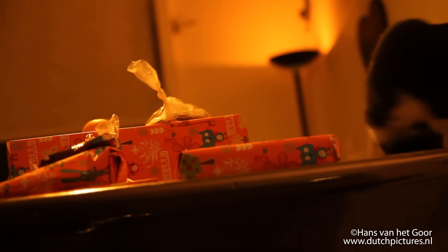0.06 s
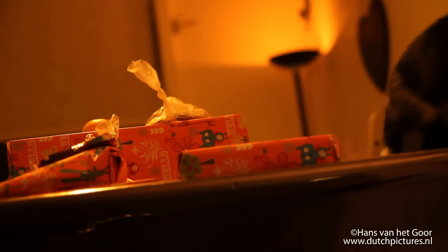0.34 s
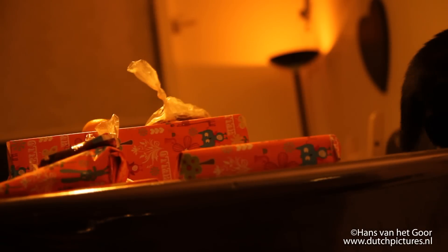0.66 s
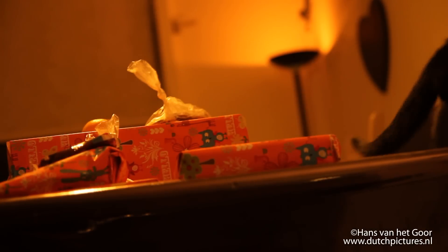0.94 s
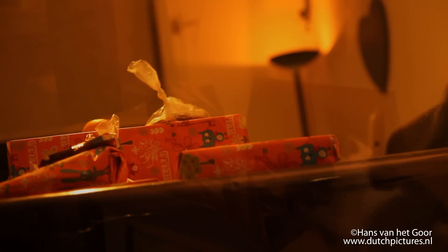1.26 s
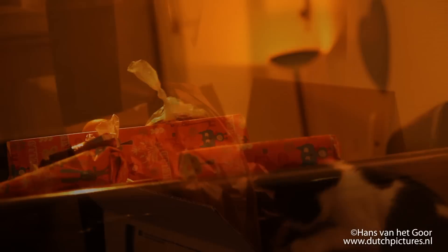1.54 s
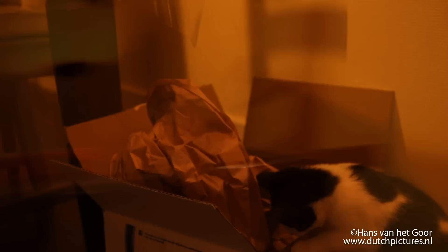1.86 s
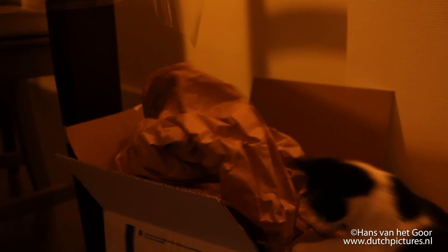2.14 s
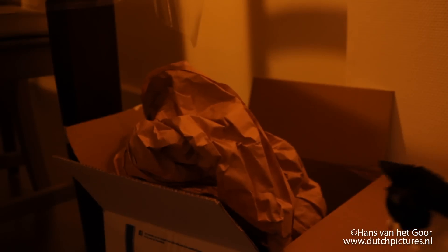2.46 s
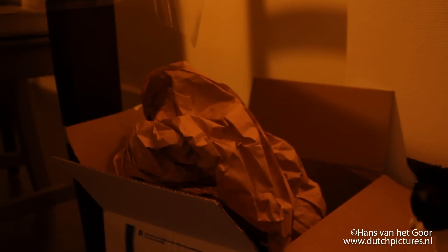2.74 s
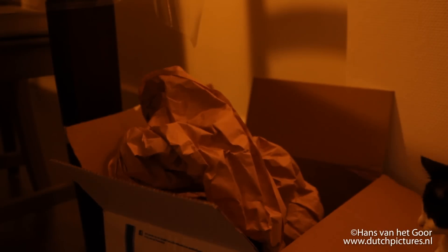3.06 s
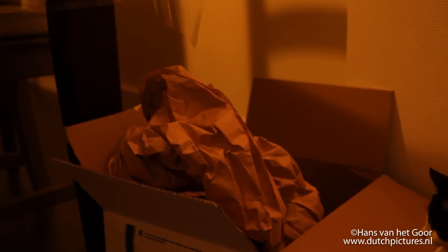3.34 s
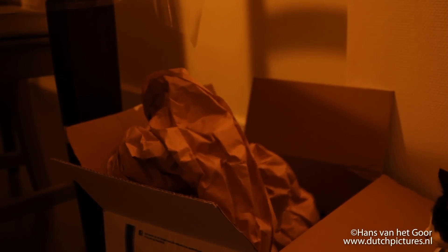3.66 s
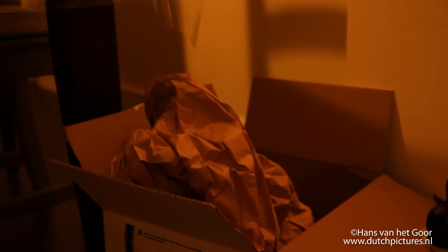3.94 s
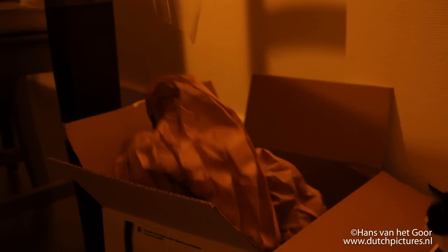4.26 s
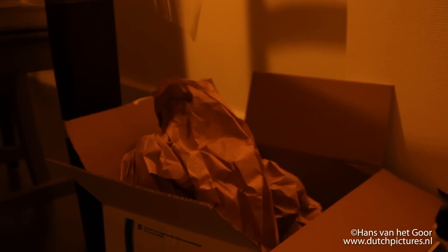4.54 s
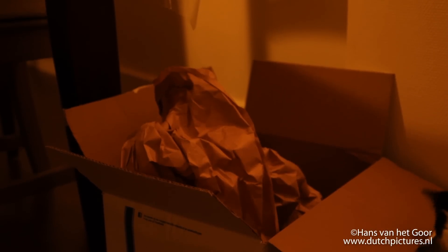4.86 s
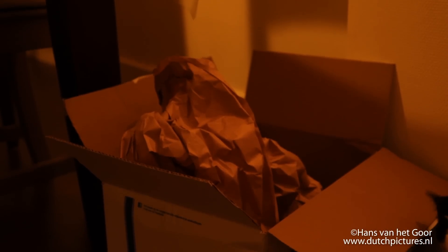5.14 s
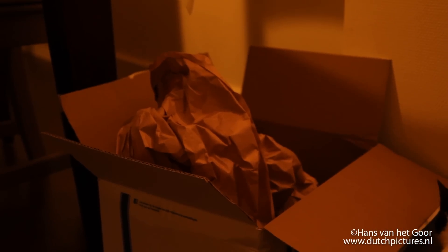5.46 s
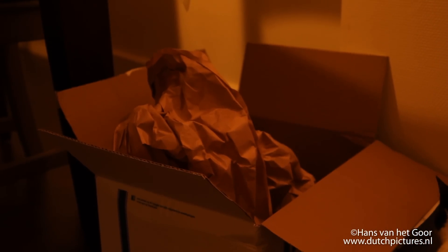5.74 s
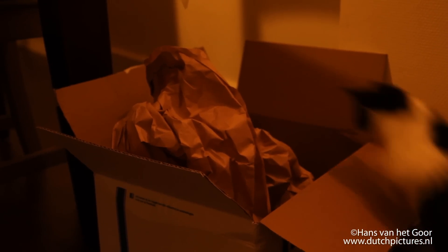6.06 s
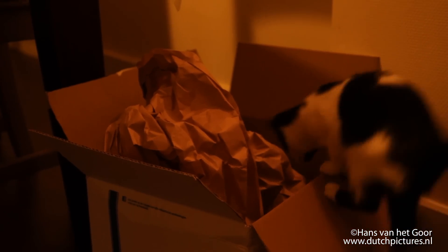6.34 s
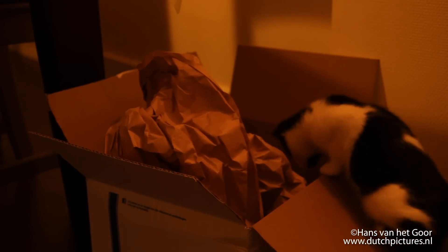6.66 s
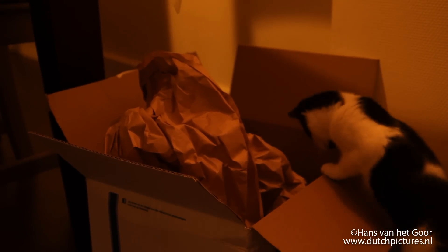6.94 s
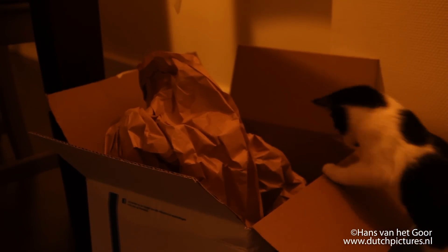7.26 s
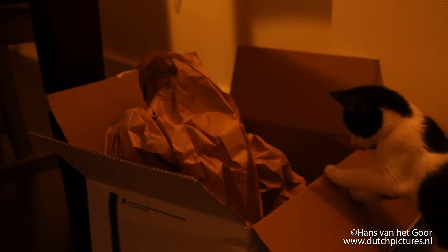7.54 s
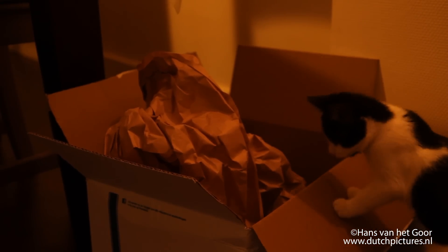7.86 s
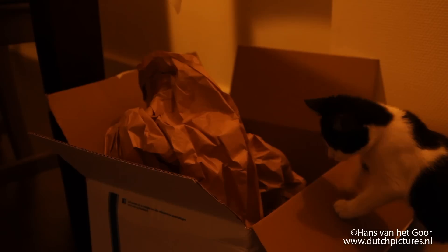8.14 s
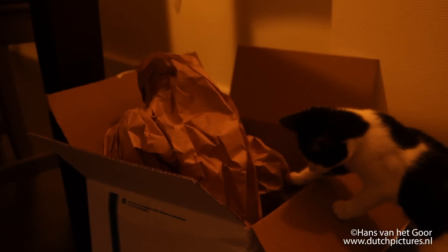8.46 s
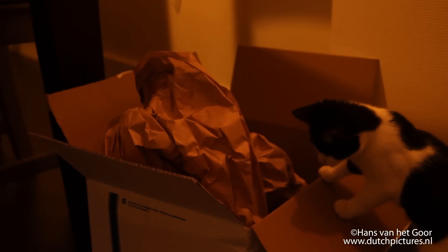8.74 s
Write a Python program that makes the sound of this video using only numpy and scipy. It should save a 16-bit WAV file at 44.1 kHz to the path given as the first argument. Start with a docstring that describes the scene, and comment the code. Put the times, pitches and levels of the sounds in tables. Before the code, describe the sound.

Soft paw thumps and a faint slide of fur on a tabletop give way to cats rustling paper inside a cardboard box. The crinkles and crisp snaps come in uneven spurts, pause, then return after some hollow steps on a cardboard flap. It is all heard from a few steps away in a still, slightly echoing room, over low hiss and a faint electric whine that disappears about two thirds through.

```python
"""Cats play in a cardboard box of crumpled packing paper, in a quiet living room with a faint whine.
First a cat turns on a table and brushes off its edge: pads thud on the panel, fur slides over it.
From 1.6 s paws crush the paper in bursts: facets buckle and ring, sheets rub, single creases snap.
Then a cat steps onto a flap of the box, the whine fades, and a last burst of crinkling starts at 8.4 s.
The box colours every stir, and the room rings after each burst."""
import sys
import numpy as np
from scipy import signal
from scipy.fft import rfft, irfft, next_fast_len
from scipy.io import wavfile
from scipy.ndimage import uniform_filter1d

SR = 44100
rng = np.random.default_rng(int(sys.argv[2]) if len(sys.argv) > 2 else 0)


def store_pcm(level_fs):
    """Save levels as 16-bit WAV."""
    pcm = np.round(np.clip(level_fs, -1, 1) * 32767).astype(np.int16)
    wavfile.write(sys.argv[1], SR, np.atleast_2d(pcm).T)


N = 388521
TIME_S = np.arange(N) / SR


def gain_of(db):
    """Decibels to amplitude."""
    return 10 ** (np.asarray(db) / 20)


def unit_rms(x):
    """Scales to rms 1."""
    return x / np.sqrt(np.mean(x ** 2) + 1e-20)


def curve_at(points, hz):
    """Interpolates (frequency, value) points on a log-frequency axis."""
    point_hz, values = np.transpose(points)
    return np.interp(np.log(hz + 1), np.log(point_hz + 1), values)


def add(mix, start_s, sound):
    """Mixes a sound in at start_s."""
    part = mix[max(round(start_s * SR), 0):][:len(sound)]
    part += sound[:len(part)]


def colour(x, db_at, size=4096):
    """Minimum-phase filter with gain db_at(hz)."""
    hz = abs(np.fft.fftfreq(size, 1 / SR))
    log_gain = np.log(gain_of(db_at(hz)) + 1e-6)
    taps = np.fft.ifft(np.exp(np.conj(signal.hilbert(log_gain)))).real
    return signal.oaconvolve(x, taps[:size // 2])[:len(x)]


# hush spectrum: (frequency [Hz], relative level [dB])
HUSH_SPECTRUM = [(25, -36), (70, -13), (120, -8.5), (200, -5.5), (380, -2), (550, -7), (1000, -8.5),
                 (2000, -13), (5000, -17.5), (10500, -23.5), (15800, -26.5)]


def hush(rms_db=-54):
    """Still room and steady hiss."""
    noise = colour(rng.standard_normal(N), lambda hz: curve_at(HUSH_SPECTRUM, hz))
    return gain_of(rms_db) * unit_rms(noise)


# whine partials: (frequency [Hz], rms level [dB])
WHINE_TONES = [(650, -65), (1301, -71.5)]


def whine(fade_span_s=(6.0, 6.6)):
    """Faint electric whine: steady tones that fade out."""
    tones = sum(gain_of(db) * np.sqrt(2) * np.sin(2 * np.pi * hz * TIME_S) for hz, db in WHINE_TONES)
    return tones * np.interp(TIME_S, fade_span_s, [1, 0])


def room_mode(x, hz=201, t60_s=1.84, tap_db=-66):
    """One low room resonance outlasts the echoes."""
    t = TIME_S[:2 * SR]
    ring = gain_of(tap_db - 60 * t / t60_s) * np.sin(2 * np.pi * hz * t)
    return signal.oaconvolve(x, ring)[:N]


# room reverberation: (frequency [Hz], T60 [s])
ROOM_DECAY = [(90, 0.75), (200, 0.29), (400, 0.67), (1400, 0.59), (3000, 0.48), (6000, 0.42), (12000, 0.33)]


def reflections(gap_s=0.0038, build_s=0.0016):
    """Impulse response: dense echoes of random sign, each band dying at its own rate."""
    hz, t, bands = signal.stft(rng.choice([-1., 1.], SR), SR, nperseg=256)
    t60_s = curve_at(ROOM_DECAY, hz)[:, None]
    decaying = bands * gain_of(-60 * t / t60_s) / np.sqrt(t60_s)
    tail = signal.istft(decaying, SR, nperseg=256)[1][:SR]
    tail *= np.clip((TIME_S[:SR] - gap_s) / build_s, 0, 1)
    return tail / np.linalg.norm(tail)


def room_echoes(x, spots=5, dwell_s=0.004):
    """The sound leaps from spot to spot on the paper; each spot has its own echoes."""
    leaps_s = np.arange(0, TIME_S[-1] + dwell_s, dwell_s)
    spot = rng.integers(0, spots, len(leaps_s))
    shares = (np.sin(np.pi / 2 * np.interp(TIME_S, leaps_s, 1. * (spot == k))) for k in range(spots))
    return sum(signal.oaconvolve(x * share, reflections())[:N] for share in shares)


# resonances of the open box and hollows in the paper: (frequency [Hz], width [Hz], gain [dB])
BOX_MODES = [(208, 8.9, 9.5), (270, 17, 9.5), (410, 13.6, 9), (510, 10, 4.5), (775.4, 10.3, 7.5),
             (845, 11, 2.5), (1004, 28, 4.5), (1153, 12.5, 7), (1530, 31, 2.5), (1657, 7, 7.5),
             (2450, 370, -1), (2700, 31, 2), (3400, 86, 1.5)]


def box_db(hz):
    """Narrow resonances that colour everything stirring in the box."""
    return sum(db / (1 + (2 * (hz - mode_hz) / width_hz) ** 2) for mode_hz, width_hz, db in BOX_MODES)


# paper response: (frequency [Hz], gain [dB])
PAPER_SPECTRUM = [(25, -45), (50, -39), (90, -15), (180, -8.5), (360, 1.5), (720, 0), (1440, -0.5),
                  (2880, -3.5), (5760, -10), (11300, -18), (16000, -28.5)]


def paper_db(hz):
    """Broad paper colour plus the resonances around it."""
    return curve_at(PAPER_SPECTRUM, hz) + box_db(hz)


def shudder(decay_s, size=4096):
    """A dying run of rapid random slips."""
    return rng.choice([-1., 1.], size) * np.exp(-TIME_S[:size] / decay_s)


# panel response to a paw: (frequency [Hz], gain [dB])
THUD_SPECTRUM = [(25, -17), (55, -0.5), (80, -3), (120, -3.5), (200, 2), (380, -2), (700, -16.5),
                 (1440, -25.5), (4000, -40), (16000, -56)]
# paw landings: (time [s], relative level [dB], tilt [dB/octave])
PAW_STEPS = [(0.001, -19, 5), (0.05, -17, 0.5), (0.201, -18, -1), (0.236, -18.5, 3.5), (0.286, -15.5, -3),
             (0.35, -26, -4), (1.135, -22.5, -3.5), (1.719, -28, 1), (1.83, -21, -1.5), (1.869, -28, 6),
             (1.92, -38, 1), (2.171, -34, -3), (3.02, -34, 2), (4.39, -16.5, 0), (6.232, -16.5, 4),
             (6.262, -22, 3), (6.495, -14, 6), (6.612, -13, 0.5), (6.872, -18.5, 1), (6.905, -23.5, -1.5),
             (6.93, -19, -1.5), (7.56, -32, 4.5)]


def paw_steps(decay_s=0.012, press_s=0.0024, pivot_hz=200):
    """Soft pads shake the panel beneath them: deep on the table, higher on a flap."""
    out = np.zeros(N)
    octaves = lambda hz: np.log2(np.maximum(hz / pivot_hz, 0.35))
    for start_s, level_db, tilt_db_per_oct in PAW_STEPS:
        panel_db = lambda hz: curve_at(THUD_SPECTRUM, hz) + box_db(hz) + tilt_db_per_oct * octaves(hz)
        push = shudder(decay_s)
        push *= 1 - np.exp(-TIME_S[:len(push)] / press_s)
        add(out, start_s, gain_of(level_db) * colour(push, panel_db))
    return out


def stroke(crest_s, swell_s, hold_s, swell_db=22.5, sag_db=9.5, release_db_per_s=446):
    """One movement swells, sags while the paw moves, dies on release. Returns (indices, amplitude)."""
    t = TIME_S - crest_s
    db = swell_db * np.minimum(t, 0) / swell_s
    db -= sag_db * np.clip(t / hold_s, 0, 1)
    db -= release_db_per_s * np.maximum(t - hold_s, 0)
    active = np.flatnonzero(db > -60)
    return active, gain_of(db[active])


def apply_strokes(texture, strokes, band_count=6, bass_hz=340, middle_hz=1260, treble_hz=7700):
    """Gives a steady texture each stroke's level and colour, band by band; overlaps add in power."""
    centres_hz = np.geomspace(bass_hz, treble_hz, band_count)
    power = np.zeros((band_count, N))
    for crest_s, swell_s, hold_s, level_db, bass_db, treble_db in strokes:
        active, envelope = stroke(crest_s, swell_s, hold_s)
        shelves_db = curve_at([(bass_hz, bass_db), (middle_hz, 0), (treble_hz, treble_db)], centres_hz)
        power[:, active] += np.outer(gain_of(level_db + shelves_db), envelope) ** 2
    size = next_fast_len(N)
    spectrum, hz = rfft(texture, size), np.fft.rfftfreq(size, 1 / SR)
    band_gains = (curve_at(np.c_[centres_hz, share], hz) for share in np.eye(band_count))
    bands = [irfft(spectrum * gain, size)[:N] for gain in band_gains]
    return np.sum(bands * np.sqrt(power), axis=0)


def crackle(clicks_per_s, spread_db, decay_cycles, pitch_count=32, ring_samples=400, lag_samples=20):
    """Facets buckle at random, most weakly: each a crack, then a tiny ring at its own pitch."""
    strength = gain_of(spread_db * np.minimum(rng.exponential(1, N), 4)) * rng.choice([-1, 1], N)
    clicks = strength * (rng.random(N) < clicks_per_s / SR)
    clicks /= np.sqrt(abs(uniform_filter1d(clicks ** 2, size=1100)) + 1e-3)  # steady energy from the paw
    facet = rng.integers(0, pitch_count, N)
    pitch_hz = np.geomspace(500, 15000, pitch_count)[:, None]
    cycles = pitch_hz * TIME_S[:ring_samples]
    rings = pitch_hz * np.exp(-cycles / decay_cycles) * np.cos(2 * np.pi * cycles)
    onsets = np.flatnonzero(clicks)
    ringing = np.zeros(N + ring_samples)
    reach = onsets[:, None] + np.arange(ring_samples)
    np.add.at(ringing, reach, clicks[onsets, None] * rings[facet[onsets]])
    return unit_rms(unit_rms(clicks) + unit_rms(np.roll(ringing[:N], lag_samples)))


# fur and pads sliding over table and cardboard:
# (crest time [s], swell [s], hold [s], relative level [dB], bass [dB], treble [dB])
FUR_SWIPES = [(0.0, .005, 0.034, -21, 6, -24), (0.14, .15, 0.6, -55.5, -2, 11.5),
              (0.726, 0.093, 0.16, -45, -18, 9.5), (0.858, .08, .01, -42, -5, 4),
              (0.985, 0.092, 0.048, -50.5, 9.5, 12.5), (1.14, 0.29, .02, -42, 1, 4),
              (1.312, 0.097, 0.025, -44.5, -3, 9), (1.417, 0.092, .03, -48.5, 7, 8),
              (1.49, 0.046, 0.023, -41, 4, 0.5), (3.24, .04, 0.15, -54.5, -6, 18.5),
              (3.457, .08, .04, -54, -6, 17.5), (6.444, .008, 0.044, -35.5, 3, 14)]


def fur_brush(grit_db=-8):
    """Smooth friction of fur with a little grit."""
    friction = rng.standard_normal(N)
    grit = gain_of(grit_db) * crackle(clicks_per_s=600, spread_db=9.0, decay_cycles=0.52)
    return apply_strokes(unit_rms(friction + grit), FUR_SWIPES)


# creases buckling, sheets knocking, claws catching:
# (time [s], relative level [dB], centre [Hz], fall to both sides [dB/octave], flutter decay [s])
CREASE_SNAPS = [(0.001, -18.5, 930, 23, 0.0095), (1.054, -25, 2500, 1.5, 0.0036),
                (1.594, -14.5, 1900, 10, 0.0057), (1.819, -9.5, 4770, 2.5, 0.0026),
                (1.832, -7.5, 4000, 13, 0.0041), (1.835, -2, 470, 15, 0.0043), (1.852, -7, 644, 10, 0.0047),
                (1.868, -2.5, 510, 17.5, 0.0024), (2.44, -6, 5400, 10.5, 0.0016),
                (2.999, -6.5, 6000, 3.5, 0.0073), (3.04, -6.5, 935, 5.5, 0.0065),
                (3.294, -22.5, 1980, 12, 0.0046), (3.35, -25.5, 3820.0, 3, 0.0042),
                (3.371, -25, 1180, 4, 0.0071), (3.528, -7.5, 10100, 28, 0.0037),
                (3.656, -12, 493, 8, 0.0035), (4.088, -16, 2000, 18, 0.011),
                (4.261, -21, 8980.0, 4.5, 0.0023), (4.39, -1.5, 2300, 4, 0.0021),
                (4.3935, 6, 910, 11.5, 0.0035), (4.435, -3.5, 1910, 7.5, 0.011),
                (4.445, -2.5, 2340, 8.5, 0.0053), (4.804, -23, 2750, -1, 0.0021),
                (6.229, -20.5, 4300, 5, 0.0026), (6.231, -16.5, 360, 27, 0.0063),
                (6.426, -24.5, 3630.0, 2.5, 0.0035), (6.486, -12.5, 1100, 7, 0.003),
                (6.492, -9.5, 1020, 7, 0.0065), (6.493, -3, 5480.0, 18, 0.0027),
                (6.607, -12, 3800, 10, 0.0032), (6.913, -24, 3430.0, 11, 0.0033),
                (6.942, -23.5, 4500, 10, 0.0017), (6.979, -25, 8550.0, 4.5, 0.0064),
                (7.097, -7.5, 1190, 10, 0.003), (7.103, -6, 2720, 24, 0.0072),
                (7.108, -10, 11000, 9, 0.002), (7.111, -10.5, 3060, 15, 0.0065),
                (7.337, -38, 2460, -4.5, 0.002), (7.643, -30.5, 8630.0, 14, 0.0031),
                (8.431, -18, 5390.0, 16, 0.0037), (8.588, -17, 3340.0, 2.5, 0.013),
                (8.641, -8.5, 4400, -1.5, 0.0023)]


def crease_snaps():
    """A crease gives way and the sheet flutters; small facets sound high, large ones low."""
    out = np.zeros(N)
    for start_s, level_db, centre_hz, fall_db_per_oct, flutter_s in CREASE_SNAPS:
        facet_db = lambda hz: -fall_db_per_oct * (np.hypot(1, np.log2((hz + 1) / centre_hz)) - 1)
        add(out, start_s, gain_of(level_db) * colour(shudder(flutter_s), facet_db))
    return out


# paws pushing into paper; bass from whole sheets, treble from fine creases:
# (crest time [s], swell [s], hold [s], relative level [dB], bass [dB], treble [dB])
PAPER_PUSHES = [(1.624, 0.038, 0.02, -24.5, 4, 3.5), (1.722, .024, 0.083, -32.5, 4, -3),
                (1.834, 0.016, 0.011, -11, 9.5, 1), (1.913, .06, 0.077, -28, -13, -5.5),
                (2.131, 0.054, 0.035, -16, 2.5, 3.5), (2.184, 0.042, 0.073, -9.5, -0.5, 1.5),
                (2.375, 0.071, 0.068, -19, -0.5, -3.5), (2.563, 0.05, 0.034, -38.5, 11, -2),
                (2.967, 0.011, .035, -21, -1, -2.5), (3.035, 0.051, .006, -14.5, 1.5, 4.5),
                (3.18, .09, .06, -41.5, 2, 1.5), (3.375, 0.12, .04, -41.5, 11, 0),
                (3.537, 0.057, 0.021, -19, -5, -8), (3.657, .006, 0.024, -19.5, -6, -7),
                (3.688, 0.064, 0.091, -14.5, -3, -5), (3.823, 0.031, 0.047, -13, -6.5, -2),
                (3.877, 0.084, 0.028, -11, -10.5, -5), (4.094, 0.018, 0.056, -27, -9, -1.5),
                (4.298, .007, 0.019, -20.5, 5, 3), (4.319, .015, 0.11, -19, -0.5, 4.5),
                (4.428, 0.13, 0.049, -15.5, -5, -4.5), (4.805, 0.069, 0.053, -29.5, -7, -6.5),
                (5.086, 0.22, 0.056, -40.5, -18, -8), (5.549, 0.12, .008, -41, -5, -2),
                (6.235, 0.018, .01, -40, -1, -4), (6.289, 0.014, 0.0068, -41.5, 0, 9.5),
                (6.372, .06, .03, -47, 6, -4), (6.495, 0.016, 0.0045, -13, -1, -19),
                (6.56, .028, .02, -34, 7, 9), (6.66, 0.11, 0.18, -41.5, -4, 4),
                (6.837, 0.12, 0.0088, -41, -3, 11.5), (6.897, 0.094, 0.071, -44, 12, 6),
                (7.095, 0.0033, 0.011, -27.5, -11, 9), (7.617, .16, 0.042, -51.5, 8, 4),
                (8.441, 0.016, 0.017, -21, -1, 1.5), (8.554, 0.1, .015, -25, -2, -0.5),
                (8.594, 0.0088, 0.047, -18, 0, 4), (8.633, 0.047, 0.011, -13.5, -9.5, -5.5),
                (8.69, .04, 0.11, -31.5, 1, -7)]


def paper_rustle(rub_db=-8):
    """Crackling creases over the softer hiss of sheet rubbing on sheet."""
    creases = crackle(clicks_per_s=2400, spread_db=2.5, decay_cycles=5.6)
    rubbing = gain_of(rub_db) * rng.standard_normal(N)
    return apply_strokes(unit_rms(creases + rubbing), PAPER_PUSHES)


def scene(direct_db=(0.5, 1.78, 1.0), room_send_db=(0.7, -0.92, 0.0)):
    """Paper and paws a few steps away, in mono; gains ordered (rustle and fur, snaps, steps)."""
    rustle_and_fur = colour(paper_rustle() + fur_brush(), paper_db)
    snaps = colour(crease_snaps(), paper_db)
    sources = np.array([rustle_and_fur, snaps, paw_steps()])
    direct = gain_of(direct_db) @ sources
    room_send = gain_of(room_send_db) @ sources
    return (direct + room_echoes(room_send) + room_mode(room_send) + hush() + whine())[None]


def record(dry, low_cut_hz=48, ceiling=0.9, high_cut_hz=15950):
    """Thins the deepest bass, rounds off peaks, limits the band."""
    thinned = signal.sosfilt(signal.butter(2, low_cut_hz, "highpass", fs=SR, output="sos"), dry)
    rounded = ceiling * np.tanh(thinned / ceiling)
    taps = signal.firwin(511, high_cut_hz, window=("kaiser", 9), fs=SR)
    return signal.oaconvolve(rounded, taps[None], "same")


dry = scene()
out = record(dry)
store_pcm(out)
```